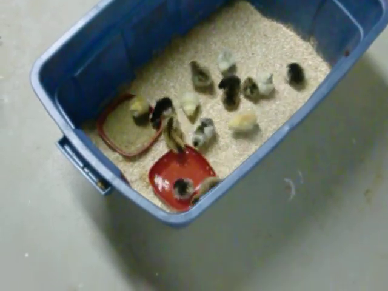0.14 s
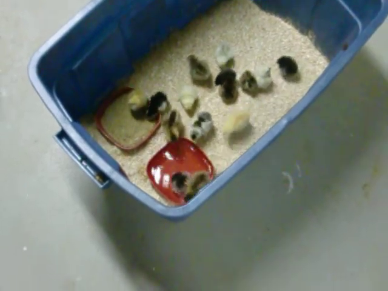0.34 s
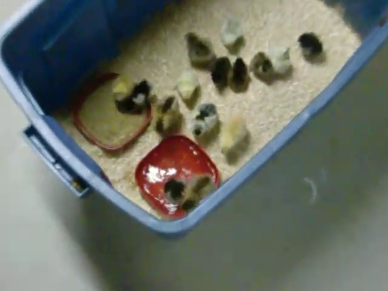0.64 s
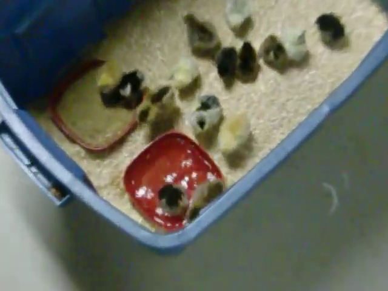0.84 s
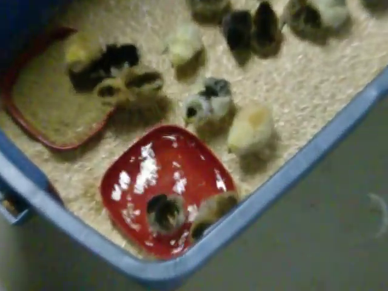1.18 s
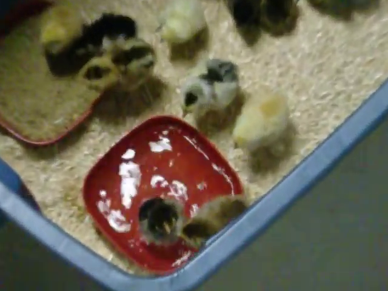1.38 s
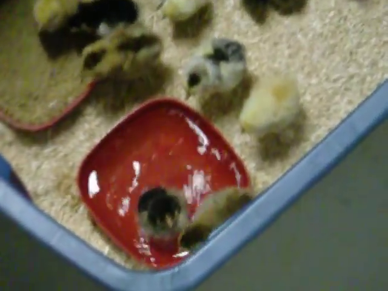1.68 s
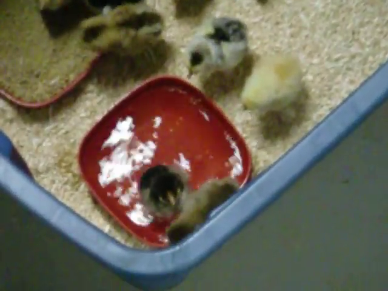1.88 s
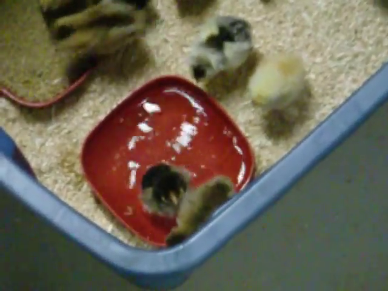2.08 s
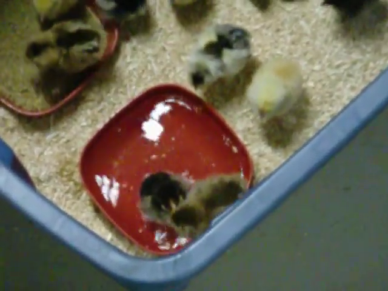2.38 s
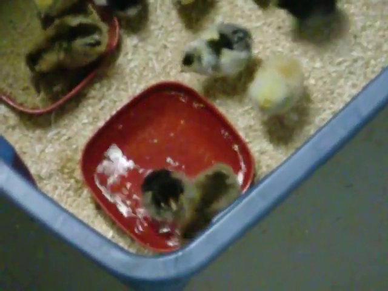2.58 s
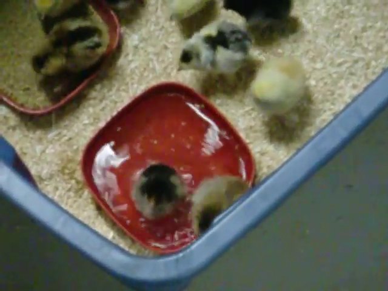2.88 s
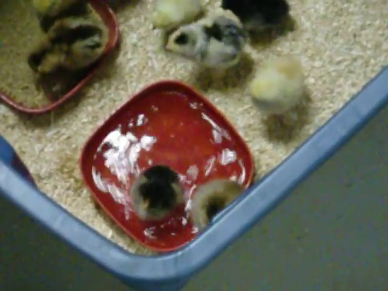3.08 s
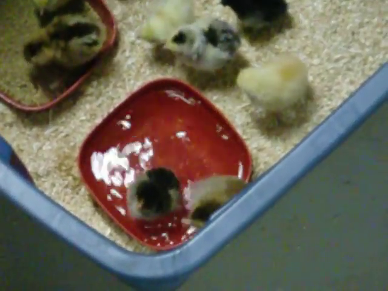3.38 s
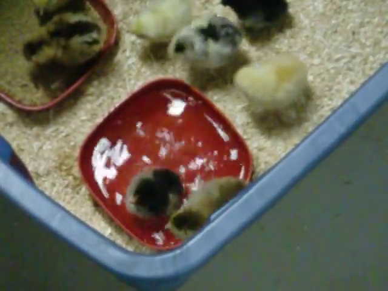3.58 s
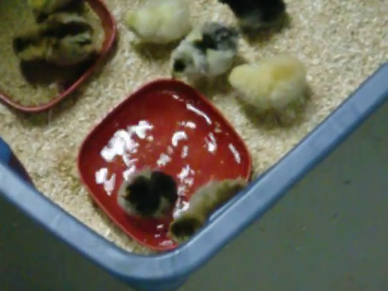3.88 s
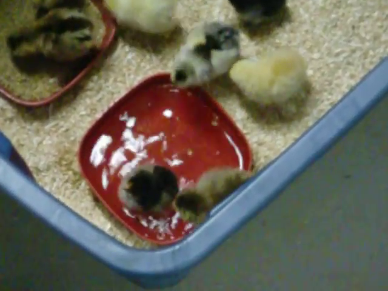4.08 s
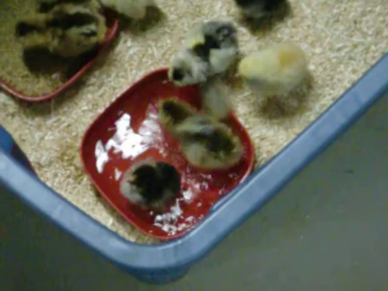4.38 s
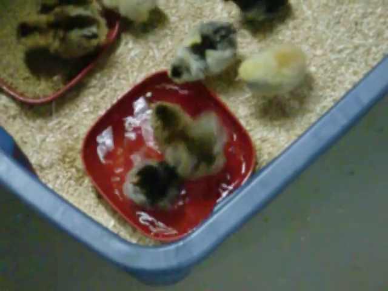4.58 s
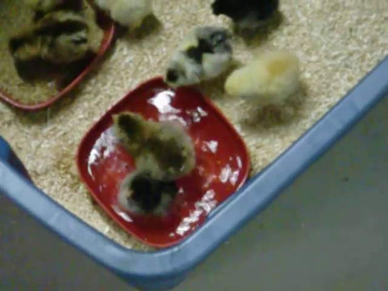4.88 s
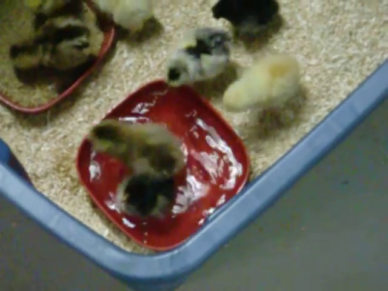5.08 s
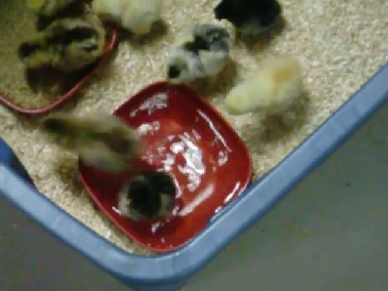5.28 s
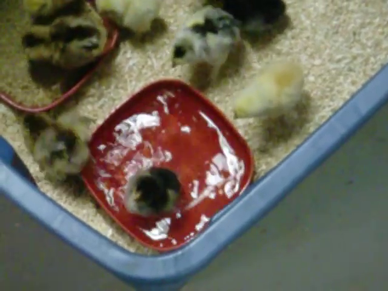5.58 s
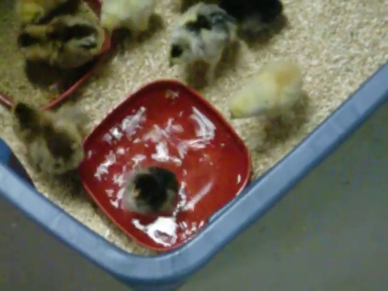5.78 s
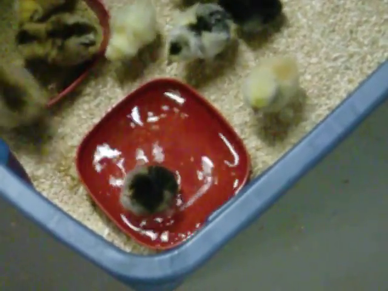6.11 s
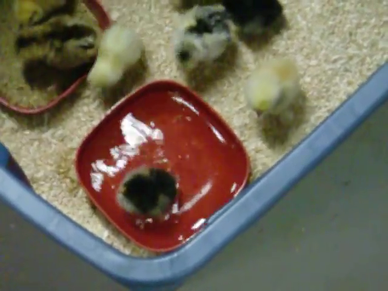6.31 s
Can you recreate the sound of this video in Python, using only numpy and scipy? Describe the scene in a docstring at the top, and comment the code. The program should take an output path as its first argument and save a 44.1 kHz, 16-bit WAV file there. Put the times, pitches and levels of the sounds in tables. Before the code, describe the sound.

Overlapping high, sliding chirps from a crowd of day-old chicks, close and lively, with faint ticks on plastic and bumps on a handheld microphone.

```python
"""Chicks in a plastic tub

Day-old chicks peep over one another in an open tub on the floor of a bare room: gliding whistles with overtones.
Feet and beaks tap a plastic dish (cracks and ringing modes) and rustle the shavings (grainy noise).
The recorder is hand-held: the hand rumbles, a finger knocks it twice hard and often softly.
Tub echoes and a room tail surround the sources; the converter adds a hiss that follows the sound."""
import sys
import numpy as np
from scipy import signal
from scipy.fft import rfft, irfft
from scipy.io import wavfile
from scipy.ndimage import uniform_filter1d

SR = 44100
rng = np.random.default_rng(int(sys.argv[2]) if len(sys.argv) > 2 else 0)


def wrap_up_sound(samples):
    """Save the sound to the file named by the first command line argument, as 16-bit audio."""
    columns = np.atleast_2d(samples).T
    # keep every value between -1 and 1, then stretch to whole-number steps
    tamed = np.clip(columns, -1, 1)
    steps = np.round(tamed * 32767).astype(np.int16)
    wavfile.write(sys.argv[1], SR, steps)


N = 284445   # samples

# Room tone at the microphone. Each row: frequency in Hz, relative density in dB per Hz.
AIR_SPECTRUM = [(60, -47), (100, -16), (200, -5), (320, 2.5), (460, -7), (1000, -8), (2100, -15),
                (4000, -8.5), (7700, -21), (15800, -29)]
# Feet in the shavings and the hand on the recorder. Each row: time in seconds, rustle in dB, rumble in dB.
STIR_LEVELS = [(0.0, -68, -53), (0.29, -68, -54), (0.43, -54, -50.5), (0.84, -49.5, -47.5),
               (0.97, -40, -49), (1.38, -48.5, -51), (1.44, -31, -49), (1.57, -40, -57), (1.67, -56, -54.5),
               (2.53, -53, -59), (2.8, -49, -57), (2.91, -72, -61), (3.4, -54, -59.5), (3.65, -46, -60.5),
               (4.4, -48, -60), (4.76, -64, -63), (4.97, -48, -62), (5.12, -66, -59.5), (6.45, -77, -62)]
# Colour of the shavings. Each row: frequency in Hz, relative density in dB per Hz.
RUSTLE_SPECTRUM = [(300, 4), (800, 1.5), (1500, 9), (2500, 11), (5000, 11), (12000, -4)]
# Finger knocks on the recorder, ahead of its bass cuts.
# Each row: time in seconds, peak in dB, direction as a sign, rise and fall time constants in seconds.
KNOCKS = [(0.237, 0.5, -1, 0.0011, 0.005), (2.0689, 1, 1, .0011, 0.0071), (2.372, -32, 1, 0.003, .003),
          (2.452, -33, 1, 0.0026, 0.0027), (3.496, -40, 1, 0.0016, 0.002), (3.699, -32, 1, 0.0017, 0.0016),
          (3.928, -27, 1, 0.0018, 0.0012), (4.203, -35, 1, 0.0045, 0.0046), (6.11, -33, 1, 0.0026, .003)]
# Bass cuts of the input. Each entry: corner in Hz, first the upper stage, then the lower one.
BASS_CUTS_HZ = [64, 9.3]
# Faint low blips. Each row: start in seconds, length in seconds, pitch in Hz, level in dB.
BLIPS = [(5.362, 0.042, 1600, -41), (5.367, 0.022, 998, -44), (5.407, 0.015, 974, -41.5),
         (5.411, 0.018, 1590, -54), (5.529, 0.029, 1596, -46.5), (2.784, 0.017, 1260, -38.5)]
# Taps on the dish. Each row: start in seconds, crack level in dB, crack pitch in Hz, ring against the crack in dB.
TAPS = [(0.235, -40, 2420, -24), (0.329, -33, 2280, -34), (0.428, -30.5, 1890, -42),
        (0.663, -34, 1890, -40), (1.513, -28, 1870, -35), (1.56, -26, 1900, -44), (1.578, -22, 2770, -44),
        (2.068, -26.5, 2060, -40), (2.723, -33, 1605, -15), (2.786, -35, 1330, -31),
        (3.777, -30.5, 1030, -21), (4.379, -23.5, 1360, -41), (4.9244, -20.5, 1890, -8.5),
        (5.341, -34, 1840, -33)]
# Ringing modes of the dish. Each row: frequency in Hz, relative level in dB, time to fall 60 dB in seconds.
DISH_MODES = [(491, -15, 0.3), (518, -8, 0.24), (561, -10, 0.15), (1230, -17, 0.09), (1580, -8, 0.055),
              (1870, -27, 0.06)]
# Peeps of the chicks. Some break in register within the row, through the early fall; others go on in a second row.
# Each row: start in seconds, rise, hold and fall in seconds, start, top, knee and end pitch in Hz,
# early fall from -1 to 1, start, top, knee and end level in dB,
# shift of the third and fourth partials in dB, shift of the second partial in dB.
PEEPS = [(0.0, 0.028, 0.038, 0.032, 5630, 5410, 5100, 3900, -0.12, -24, -26.5, -20, -30, -11, -1),
         (0.0, 0.022, 0.077, 0.054, 3770, 3925, 3600, 2600, -0.37, -27, -21.5, -23, -39, 7, 3.5),
         (0.0, 0.0012, 0.013, 0.028, 3510, 3480, 3380, 2690, -0.057, -26, -33, -28, -41, 0, 11.5),
         (0.228, 0.021, 0.005, 0.0065, 4360, 4710, 4530, 3970, -0.18, -39, -33, -31, -23.5, -3, -3),
         (0.263, 0.0012, 0.045, 0.027, 4170, 3990, 3870, 3120, -0.27, -26, -33.5, -34.5, -34, 5, 14),
         (0.298, 0.015, 0.082, 0.018, 4700, 5060, 5000, 5400, 0.49, -35, -42, -39, -35, -15, 3),
         (0.308, 0.072, 0.027, 0.043, 5640, 5930, 5100, 3380, 0.81, -45, -52, -23, -40, 4, 3),
         (0.438, 0.012, 0.04, 0.046, 4520, 4330, 3960, 2723, 0.41, -41, -51, -26, -38, 7.5, 4.5),
         (0.683, 0.018, 0.02, 0.089, 4760, 4720, 4600, 3005, 0.58, -51, -54, -31.5, -46.5, 2, 7),
         (0.75, 0.12, 0.014, 0.051, 4600, 5870, 5220, 3360, 0.8, -37, -38.5, -20.5, -37, 1, 2),
         (0.799, 0.027, 0.065, 0.063, 5770, 5920, 5570, 5380, -0.4, -51, -47, -30.5, -38, 0, -1),
         (0.818, 0.005, 0.041, 0.02, 3560, 3570, 3670, 3600, 0, -48, -40, -52, -48, -19, -6),
         (0.839, 0.02, 0.001, 0.002, 2300, 2900, 2830, 2800, 0.0, -46, -44, -54, -53, 12, 7),
         (0.856, 0.016, 0.00084, 0.002, 4290, 4680, 4680, 4680, 0, -50, -42, -46, -50, -15, -6),
         (0.931, 0.027, 0.032, 0.054, 4500, 4180, 3800, 2630, 0.35, -32, -36, -24, -43.5, 6, 5.5),
         (1.062, 0.041, 0.0069, 0.018, 5060, 5330, 5000, 4180, 0.0, -35, -23, -30, -27, 4, -3),
         (1.063, 0.047, 0.0009, 0.0017, 2740, 3590, 3600, 3600, 0.0, -39, -45, -47, -53, 6, -3),
         (1.099, 0.026, 0.084, 0.0041, 3710, 3890, 3680, 3800, 0.0, -34, -30, -27, -40, 11, -3),
         (1.129, 0.006, 0.013, 0.016, 3060, 3170, 2926, 2460, 0.0, -50, -52, -37, -38, 2, -2),
         (1.131, 0.018, 0.034, 0.027, 4180, 4017, 3940, 2860, 0.0, -20, -20.5, -27, -39, 6, 7),
         (1.189, 0.0061, 0.068, 0.047, 3750, 3803, 3520, 2640, -0.43, -29, -21.5, -23.5, -45, 5.5, -0.5),
         (1.367, 0.038, 0.0065, 0.042, 3880, 4900, 4700, 4390, 0.17, -39, -38, -37, -34, -2, 2),
         (1.407, 0.044, 0.018, 0.052, 5036, 4415, 4250, 3120, -0.039, -55, -37, -24.5, -35, 4, -4),
         (1.469, 0.062, 0.022, 0.02, 4290, 5240, 5180, 4400, -0.97, -34, -22.5, -18.5, -44, -15, -6),
         (1.47, 0.0063, 0.047, 0.01, 3550, 3450, 3280, 2880, 0.25, -47, -60, -31, -43, 6, 6),
         (1.508, 0.011, 0.073, 0.025, 5500, 5574, 5185, 4020, 0.45, -32, -31.5, -17, -39, -17, -14),
         (1.575, 0.0013, 0.0083, 0.039, 4210, 4530, 4030, 2830, -0.79, -31, -22, -15, -35, 1, -0.5),
         (1.671, 0.11, 0.075, 0.04, 3802, 3930, 3670, 2665, -0.3, -32.5, -20.5, -20, -38.5, 5.5, -0.5),
         (1.802, 0.012, 0.027, 0.047, 3680, 3660, 3400, 2880, -1.1, -29, -35, -38, -54, -4, -1),
         (1.812, 0.001, 0.014, 0.024, 3650, 3540, 3430, 2580, -0.25, -45, -45, -31, -49, 0, -1),
         (1.83, 0.037, 0.033, 0.009, 4510, 4910, 4530, 4530, 0.0, -46, -39, -39, -40, 6, 8),
         (1.888, 0.025, 0.024, 0.05, 4550, 4406, 4380, 2800, -0.14, -41, -27, -27, -41.5, 10, 3.5),
         (1.924, 0.061, 0.046, 0.023, 4840, 5450, 4960, 3830, 0.27, -30, -29, -23, -29, 3, 1.5),
         (2.025, 0.014, 0.012, 0.034, 4360, 4030, 3884, 3160, -0.2, -20.5, -22.5, -17.5, -54, 8.5, 6.5),
         (2.086, 0.02, 0.023, 0.024, 4590, 4670, 4600, 4450, 0.21, -49, -40, -31, -26, -15, -1),
         (2.096, 0.018, 0.04, 0.023, 3890, 3730, 3690, 2410, -0.49, -42, -33, -28, -37.5, 8, 5.5),
         (2.104, 0.001, 0.023, 0.025, 5840, 5950, 5800, 5250, 0.0, -41, -43, -45, -51, 0, 0),
         (2.147, 0.034, 0.095, 0.034, 4250, 5560, 5160, 3160, -0.25, -43, -33, -16, -34, 0, 0),
         (2.165, 0.13, 0.072, 0.05, 3737, 4020, 3685, 2675, -0.55, -28, -19, -20, -39.5, 6.5, 2.5),
         (2.237, 0.024, 0.01, 0.022, 5900, 5960, 5940, 5770, 0.0, -58, -51, -46, -52, 0, 0),
         (2.327, 0.001, 0.002, 0.018, 4940, 5000, 4860, 4490, -0.26, -13, -25, -32, -33, 6, 4),
         (2.337, 0.035, 0.019, 0.076, 4490, 4540, 4430, 3156, 0.17, -44, -36, -22.5, -44, 0, 0),
         (2.358, 0.014, 0.043, 0.053, 4140, 4185, 4070, 2840, 0.295, -22, -24, -32, -47, 22.5, 14),
         (2.402, 0.011, 0.065, 0.041, 5030, 4960, 4270, 3170, 0.22, -38, -43, -28, -46, -4, -9),
         (2.426, 0.045, 0.044, 0.02, 5000, 5450, 5000, 4380, -0.071, -31, -31, -27.5, -41, -13, 0),
         (2.515, 0.00076, 0.02, 0.015, 3710, 3740, 3160, 2560, -0.63, -46, -49, -35, -50, 20, -8),
         (2.524, 0.00096, 0.018, 0.049, 4360, 4260, 4150, 2970, -0.47, -27, -33, -16, -46, 8, 6.5),
         (2.574, 0.022, 0.11, 0.048, 4250, 5466, 5120, 3040, -0.64, -26, -25.5, -15, -38, 7, 1.5),
         (2.635, 0.039, 0.042, 0.066, 3800, 4265, 4137, 2490, -0.12, -40, -18, -20, -46, 15.5, 10.5),
         (2.735, 0.057, 0.13, 0.049, 3633, 3963, 3674, 2620, -0.33, -28, -24, -19, -40.5, 4, -1.5),
         (2.775, 0.00088, 0.031, 0.058, 4640, 4680, 4450, 3885, -0.15, -28, -30, -24, -26, -4, 1.5),
         (2.842, 0.0013, 0.015, 0.012, 3900, 3860, 3360, 2540, 0.24, -31, -28, -25, -37.5, 8, -2),
         (2.971, 0.032, 0.12, 0.037, 4240, 5450, 5120, 2325, -0.22, -30, -25.5, -14.5, -36, 3, 0.5),
         (3.009, 0.014, 0.015, 0.047, 4040, 4530, 4296, 3700, 0.2, -37, -24, -21.5, -18.5, 6, 5),
         (3.1, 0.0012, 0.012, 0.025, 3630, 3650, 3800, 3445, 0.44, -15, -23, -26.5, -25.5, -3, 11.5),
         (3.167, 0.011, 0.019, 0.039, 3580, 3720, 3500, 2350, 0.33, -28, -31, -24, -36, -2, -7),
         (3.226, 0.016, 0.025, 0.054, 4410, 4640, 4330, 2865, 0.3, -32, -31.5, -25, -38.5, 1, 4),
         (3.339, 0.035, 0.021, 0.01, 5050, 5500, 5170, 4150, 0.071, -32, -28, -28, -19, 1, -6),
         (3.359, 0.0092, 0.002, 0.007, 3930, 4450, 4350, 3760, 0.21, -26, -19, -25, -32, -20, -16),
         (3.382, 0.038, 0.054, 0.022, 3800, 3808, 3580, 2420, -0.21, -30, -32, -22.5, -46, 10, 12),
         (3.4, 0.045, 0.11, 0.038, 4930, 5620, 5086, 3550, 0.21, -25, -28.5, -16, -33, -14, -3.5),
         (3.401, 0.022, 0.024, 0.024, 4230, 4123, 3905, 3565, -0.15, -20, -17.5, -18.5, -36, 11, 10),
         (3.535, 0.0015, 0.035, 0.03, 3810, 3740, 3640, 2310, 0.79, -35, -29, -24.5, -37, -15, -12),
         (3.611, 0.026, 0.028, 0.023, 4750, 4860, 4470, 3700, -0.2, -31, -25.5, -24, -39, 4, -10),
         (3.704, 0.011, 0.0027, 0.0087, 4300, 4564, 4590, 3970, 0.0, -21, -21, -25, -25.5, 2, 8),
         (3.722, 0.015, 0.03, 0.033, 3950, 3960, 3810, 3000, 0.0, -26, -30, -26, -37, 15, 8),
         (3.756, 0.038, 0.04, 0.027, 5070, 5440, 5020, 4320, 0.58, -26, -24.5, -25, -32, 8, -8),
         (3.78, 0.0015, 0.032, 0.029, 3844, 3960, 3704, 2510, -0.52, -21, -21.5, -21, -47, 5, 10),
         (3.787, 0.013, 0.001, 0.0017, 4640, 4780, 4780, 4740, 0.0, -32, -30, -30, -33, -15, -6),
         (3.816, 0.045, 0.074, 0.06, 5580, 5620, 5270, 2880, 0.29, -26, -14.5, -14, -43, -3, -4.5),
         (3.85, 0.021, 0.028, 0.014, 4320, 4050, 3730, 2550, -0.09, -18.5, -19, -20.5, -22, 6, 3),
         (4.009, 0.044, 0.002, 0.009, 4610, 5060, 5100, 3500, 0.5, -23, -18, -19, -42, -15, -4),
         (4.059, 0.015, 0.029, 0.03, 7400, 7150, 6630, 5530, -0.041, -30, -28, -22.5, -44, 0, 0),
         (4.061, 0.013, 0.024, 0.032, 3680, 3510, 3430, 2780, -0.33, -21, -24.5, -22, -41, 2, 0),
         (4.08, 0.001, 0.002, 0.0069, 4930, 5030, 4970, 4800, -0.023, -32, -28, -35, -41, -15, -6),
         (4.096, 0.031, 0.043, 0.023, 4820, 4720, 4240, 3350, -0.021, -38, -36, -28, -46, -15, -6),
         (4.187, 0.052, 0.11, 0.041, 4830, 5513, 5237, 2380, 0.01, -31, -19.5, -18.5, -44, -2, -8),
         (4.187, 0.001, 0.05, 0.017, 4520, 4600, 4480, 4300, 0.083, -41, -36, -33.5, -22, 4, 13),
         (4.24, 0.012, 0.018, 0.056, 5400, 5100, 4620, 3010, 0.56, -25, -41, -23, -35, -4, 1),
         (4.307, 0.056, 0.052, 0.016, 3730, 3983, 3760, 3810, 0.0, -37, -21.5, -17, -40, 3, -1),
         (4.376, 0.022, 0.024, 0.021, 4370, 4000, 3707, 2800, -0.67, -16, -27.5, -23, -50, -2, 8.5),
         (4.414, 0.0018, 0.053, 0.041, 3720, 3840, 3550, 2670, -0.81, -41, -38, -25, -37, 7, 6.5),
         (4.622, 0.022, 0.037, 0.042, 4050, 4130, 3750, 2370, -0.29, -47, -29.5, -24, -39, -41, -18),
         (4.642, 0.029, 0.028, 0.01, 4110, 4820, 4550, 4470, -0.34, -49, -44, -36, -34, -11, -5),
         (4.687, 0.056, 0.11, 0.042, 5350, 5570, 5070, 2930, 0.4, -27, -16.5, -19, -45, -3, -4.5),
         (4.743, 0.021, 0.029, 0.034, 4560, 4450, 4070, 3210, 0.081, -35, -34, -27, -38, -5, -5),
         (4.796, 0.011, 0.01, 0.027, 4810, 5100, 5060, 4680, -0.16, -31, -25, -25, -31, -15, -4),
         (4.849, 0.026, 0.028, 0.02, 4220, 4040, 3920, 2220, -0.92, -15, -20.5, -21, -41, 7, 6),
         (4.938, 0.058, 0.12, 0.045, 3800, 3947, 3594, 2715, -0.43, -30, -20, -22, -35.5, 5, 4),
         (5, 0.0012, 0.003, 0.041, 3690, 3900, 3700, 2380, 0.32, -37, -33, -21.5, -43, -27, -19),
         (5.292, 0.081, 0.00063, 0.002, 2520, 4940, 4830, 4970, 0.12, -41, -42, -64, -54, -17.5, -17),
         (5.297, 0.037, 0.13, 0.026, 5110, 5560, 5100, 3320, 0.78, -55, -27.5, -17.5, -32, -11, -5.5),
         (5.305, 0.049, 0.028, 0.027, 3920, 4090, 3880, 2470, 0.99, -45, -23, -28.5, -30.5, -15, -10),
         (5.371, 0.0009, 0.029, 0.053, 4650, 4640, 4530, 4170, 0.34, -46, -42, -43, -26, -15, -1),
         (5.5, 0.0018, 0.011, 0.028, 4700, 4720, 4500, 3310, -0.044, -27, -28, -23.5, -38, -19, -14),
         (5.644, 0.027, 0.0046, 0.016, 3910, 4224, 4024, 2770, 0.0, -48, -28, -31, -26.5, -21, -13),
         (5.695, 0.001, 0.019, 0.016, 2687, 2806, 2713, 2280, 0.0, -19, -18, -26.5, -40, -24, -12),
         (5.84, 0.07, 0.013, 0.011, 3600, 4760, 4530, 4490, -0.24, -60, -43.5, -38, -35, 1, 12),
         (5.918, 0.017, 0.031, 0.057, 4500, 4390, 4490, 3010, 0.42, -41, -50, -32.5, -39, 2, 0.5),
         (5.92, 0.02, 0.0046, 0.013, 6500, 6690, 6530, 6550, 0.0, -59, -49, -50, -59, -5, 8),
         (5.992, 0.045, 0.02, 0.039, 3810, 3870, 3610, 2490, 0.88, -36, -30.5, -28.5, -31.5, -16, -16.5),
         (6.18, 0.015, 0.0011, 0.002, 4480, 4840, 5070, 5070, 0.0, -43, -45, -54, -58, -21, -8),
         (6.183, 0.001, 0.015, 0.014, 2520, 2590, 2290, 2340, 0.0, -52, -48, -42, -53, -18, -19),
         (6.201, 0.014, 0.004, 0.015, 3740, 4210, 4240, 4080, 0.0, -44, -49, -40, -61, -18, -9),
         (6.282, 0.015, 0.046, 0.032, 4060, 4092, 3900, 2340, 1, -36, -30.5, -21, -36, -30, -15.5)]
# Upper overtones: the microphone resonates near 11-12 kHz and lifts overtones there.
# Each row: pitch in Hz, third partial in dB, fourth partial in dB, both before the shift of the peep.
UPPER_PARTIALS = [(2600, -36, -35), (3200, -34, -41), (3440, -28.5, -44), (3835, -23, -44),
                  (4070, -30, -29), (4500, -47, -45), (5000, -42, -50)]
# Second partial against the first, strong on low notes. Each row: pitch in Hz, level in dB before the shift.
SECOND_PARTIAL = [(2400, 9.5), (2900, -3.5), (3400, -8.5), (3750, -14), (3900, -25), (4250, -22.5),
                  (4400, -28.5), (5600, -23), (7000, -10)]
# Gain of the throat on the whistle. Each row: pitch in Hz, gain in dB.
THROAT_GAIN = [(2300, 0.5), (2800, 1), (3300, 0), (3700, 1), (4200, 0.5), (4700, 2), (5200, 0), (5700, 1)]
# Echoes from the tub walls, close by. Each row: delay in seconds, level in dB against the direct sound.
TUB_ECHOES = [(.0011, -42.5), (.0023, -28), (.0037, -23.5), (.0058, -32), (.0091, -33.5)]
# Decay of the bare room. Each row: frequency in Hz, time of the first slope to fall 60 dB in seconds.
ROOM_T60 = [(300, 0.4), (2500, 0.25), (5000, 0.32), (8000, 0.27), (15000, 0.14)]
# Colour of the room tail. Each row: frequency in Hz, relative level in dB.
ROOM_COLOUR = [(300, 10.5), (2500, 1.5), (5000, 3.5), (8000, 4.5), (15000, 4)]
# Converter hiss. Each row: frequency in Hz, relative density in dB per Hz.
HISS_SPECTRUM = [(100, 3.5), (1000, 7), (3000, 7), (8000, 8), (15000, 7.5)]

# Pitch of a peep: shape of the glide to the top and of the sag, unsteadiness as a share.
RISE_POWER, SAG_POWER, PITCH_WOBBLE = 1.8, 2.7, 0.0044
# An early fall breaks at this share of its time, ahead by this share of the drop, with a swell in dB.
BREAK_SHARE, BREAK_DROP, BREAK_SWELL_DB = 0.252, 0.4, 3.5
# Level of a peep: it gives way late in the fall, and drops with the glide in dB per kHz/s.
FADE_POWER, GLIDE_LOSS_DB = 1.58, 0.0279
# Unsteady syrinx: level waver, noise skirt around the whistle, flicker of the overtones.
WAVER_DB, BREATHY_DB, FLICKER_DB = 1, -27, 2.5
# Room tail against the direct sound, and a weaker, slower second slope from the far walls.
ROOM_DB, LATE_DB, LATE_STRETCH = -6, -11, 2.7
# Dip in the microphone housing; depth is the share removed.
NOTCH_HZ, NOTCH_WIDTH_HZ, NOTCH_DEPTH = 7680, 330, 0.69
# Gain control: threshold, dB of cut per dB over it, release, attack.
LIMIT_DB, SQUEEZE, RELEASE_DB_S, ATTACK_S = -6.5, 2.13, 49, 0.014


def amp(db):
    """Turn dB into gain."""
    return 10 ** (np.asarray(db) / 20)


def rms_one(x):
    """Scale to rms 1."""
    return x / np.sqrt(np.mean(x ** 2) + 1e-20)


def at_hz(points, hz):
    """Read the first two columns of a spectrum on a log-frequency axis."""
    points = np.array(points)
    return np.interp(np.log(hz + 1), np.log(points[:, 0]), points[:, 1])


def coloured(x, spectrum):
    """Shape x by a spectrum in dB and scale to rms 1."""
    hz = np.fft.rfftfreq(len(x), 1 / SR)
    return rms_one(irfft(rfft(x) * amp(at_hz(spectrum, hz)), len(x)))


def lagged(x, seconds):
    """Smooth x with one pole."""
    r = np.exp(-1 / (max(seconds, 1e-5) * SR))
    return signal.lfilter([1 - r], [1, -r], x)


def wander(seconds):
    """Smooth random motion of rms 1: noise through two poles."""
    return rms_one(lagged(lagged(rng.standard_normal(N), seconds), seconds))


def room_air():
    """Steady room tone: coloured noise."""
    return amp(-52) * coloured(rng.standard_normal(N), AIR_SPECTRUM)


def handling_rumble():
    """Lumpy rumble of a hand on the recorder: low noise whose strength wanders."""
    s, _, rumble_db = np.transpose(STIR_LEVELS)
    lumps = rng.standard_normal(N) * amp(2.5 * wander(0.015))
    rumble = coloured(lumps, [(12, -2.0), (35, 1.5), (90, -7), (200, -10), (600, -55)])   # (Hz, dB per Hz)
    return rumble * amp(np.interp(np.arange(N) / SR, s, rumble_db))


def knocks():
    """A push on the diaphragm builds up and lets go; the input's bass cut makes it swing back."""
    t, push = np.arange(N) / SR, np.zeros(N)
    for s, peak_db, direction, rise, fall in KNOCKS:
        time_constant = np.where(t < s, rise, fall)
        push += np.sign(direction) * amp(peak_db) * np.exp(-np.abs(t - s) / time_constant)
    upper_hz, lower_hz = BASS_CUTS_HZ
    for hz in (upper_hz, lower_hz, lower_hz):
        push = push - lagged(push, 1 / (2 * np.pi * hz))
    return push


def shavings():
    """Feet stir the shavings: coloured noise with fast grains and slower surges."""
    s, rustle_db, _ = np.transpose(STIR_LEVELS)
    grains = rng.standard_normal(N) * amp(1.0 * wander(0.0016) + 3.0 * wander(0.042))
    return coloured(grains, RUSTLE_SPECTRUM) * amp(np.interp(np.arange(N) / SR, s, rustle_db))


def low_blips():
    """Faint low sines that swell and fade without a crack."""
    out = np.zeros(N)
    for s, length, hz, level_db in BLIPS:
        at, count = round(s * SR), round(length * SR)
        tone = np.sin(2 * np.pi * hz * np.arange(count) / SR)
        out[at:at + count] += amp(level_db) * np.hanning(count) ** 0.5 * tone
    return out


def dish_taps():
    """Each tap is a short crack, a fast-dying sine, that sets the modes of the dish ringing."""
    out, t = np.zeros(N), np.arange(SR // 2) / SR
    ring = sum(amp(mode_db - 60 * t / t60) * np.sin(2 * np.pi * hz * t) for hz, mode_db, t60 in DISH_MODES)
    crack_t60 = 0.011   # s
    for s, crack_db, crack_hz, ring_db in TAPS:
        crack = amp(-60 * t / crack_t60) * np.sin(2 * np.pi * crack_hz * t)
        tap = amp(crack_db) * (crack + amp(ring_db) * ring)
        at = round(s * SR)
        out[at:at + len(t)] += tap[:N - at]
    return out


def peep_pitch(up, held, down, early, start_hz, top_hz, knee_hz, end_hz):
    """The whistle slows into its top, sags ever faster while held, then falls away."""
    early = np.clip(early, -1, 1)
    if early > 0:
        lead = np.interp(down, [0, BREAK_SHARE, 1], [0, BREAK_DROP, 0])
    else:
        lead = down * (1 - down)
    pitch = top_hz + (start_hz - top_hz) * (1 - up) ** RISE_POWER
    pitch += (knee_hz - top_hz) * held ** SAG_POWER
    pitch += (end_hz - knee_hz) * (down + early * lead)
    return uniform_filter1d(pitch, size=380)   # corners of the glide are rounded


def peep_level(up, held, down, early, start_db, top_db, knee_db, end_db, pitch):
    """The level moves with the peep, swells at a break, follows the throat and drops in fast glides."""
    level_db = top_db + (start_db - top_db) * (1 - up) + (knee_db - top_db) * held
    level_db += (end_db - knee_db) * down ** FADE_POWER
    level_db += BREAK_SWELL_DB * max(early, 0) * np.interp(down, [0, BREAK_SHARE, 1], [0, 1, 0])
    khz_per_s = np.abs(np.gradient(pitch)) * SR / 1000
    return level_db + at_hz(THROAT_GAIN, pitch) - GLIDE_LOSS_DB * khz_per_s


def chicks():
    """Each peep is a near-sine whistle from the syrinx, its level shaped by the throat, with up to three overtones."""
    out, waver, skirt = np.zeros(N), wander(0.0047), wander(0.00057)
    table_hz, *upper_db = np.transpose(UPPER_PARTIALS)
    for row, (start_phase, shift) in zip(PEEPS, rng.random((len(PEEPS), 2))):
        s, rise, hold, fall = row[:4]
        early, (shrill_db, second_db) = row[8], row[13:]
        length = rise + hold + fall
        first = max(round((s - 0.004) * SR), 0)
        last = min(round((s + length + 0.0026) * SR), N)
        i = np.arange(first, last)
        t = i / SR - s
        # progress through each part, 0 to 1
        parts = ((0, rise), (rise, hold), (rise + hold, fall))
        up, held, down = (np.clip((t - at) / max(span, 1e-4), 0, 1) for at, span in parts)
        pitch = peep_pitch(up, held, down, early, *row[4:8])
        level_db = peep_level(up, held, down, early, *row[9:13], pitch)

        own = (i + int(shift * N)) % N   # every row wavers on its own
        pitch *= 1 + PITCH_WOBBLE * waver[own - N // 2]
        phase = 2 * np.pi * (np.cumsum(pitch) / SR + start_phase)
        flicker = amp(FLICKER_DB * waver[-own])   # overtones come and go more than the whistle
        second = amp(at_hz(SECOND_PARTIAL, pitch) + second_db)
        tone = np.sin(phase) + flicker * second * np.sin(2 * phase)
        for k, partial_db in zip((3, 4), upper_db):
            partial = amp(shrill_db + np.interp(pitch, table_hz, partial_db))
            below_nyquist = k * pitch < SR / 2
            tone += flicker * partial * np.sin(k * phase) * below_nyquist

        edge = np.minimum(t + 0.0016, length + 0.0044 - t) / 0.0037   # 3.7 ms fades
        unsteady = amp(WAVER_DB * waver[own]) + amp(BREATHY_DB) * skirt[own]
        out[i] += np.sqrt(2) * amp(level_db) * np.clip(edge, 0, 1) * unsteady * tone
    return out


def space(x):
    """Early echoes from the tub walls, and a noise tail of the room that dies band by band."""
    t = np.arange(SR) / SR
    tail, edges = np.zeros(len(t)), np.geomspace(200, 18000, num=9)
    for low, high in zip(edges, edges[1:]):
        band_filter = signal.butter(2, [low, high], "band", fs=SR, output="sos")
        band = signal.sosfilt(band_filter, rng.standard_normal(len(t)))
        hz = np.sqrt(low * high)
        fall_db = -60 * t / at_hz(ROOM_T60, hz)
        slopes = amp(fall_db) + amp(LATE_DB + fall_db / LATE_STRETCH)
        tail += band * amp(at_hz(ROOM_COLOUR, hz)) * slopes
    tail *= 1 - np.exp(-t / 0.0019)   # the tail builds up
    response = amp(ROOM_DB) * tail / np.sqrt(np.sum(tail ** 2))
    response[0] += 1   # direct sound
    for delay, echo_db in TUB_ECHOES:
        response[round(delay * SR)] += amp(echo_db)
    response /= np.sqrt(np.sum(response ** 2))
    return signal.fftconvolve(x, response)[:N]


def scene():
    """Chicks, dish, blips and shavings in the room; room tone, rumble and knocks reach the microphone directly."""
    in_room = space(chicks() + dish_taps() + low_blips() + shavings())
    return (in_room + room_air() + handling_rumble() + knocks())[None]


def housing_dip(x):
    """The microphone housing takes out part of a narrow band."""
    b, a = signal.iirpeak(NOTCH_HZ, NOTCH_HZ / NOTCH_WIDTH_HZ, fs=SR)
    return x - NOTCH_DEPTH * signal.lfilter(b, a, x)


def gain_control(x):
    """Peaks over the threshold duck the level, which then recovers at a steady rate in dB."""
    release_db = RELEASE_DB_S * np.arange(N) / SR
    over_db = 20 * np.log10(np.abs(x) + 1e-9) - LIMIT_DB
    held_db = np.maximum.accumulate(SQUEEZE * over_db + release_db) - release_db
    return x * amp(-lagged(np.maximum(held_db, 0), ATTACK_S))


def converter_hiss(x):
    """Coloured noise that follows the running slope of the sound, as the converter's step size does."""
    slope = np.sqrt(lagged(np.diff(x, prepend=0) ** 2, 0.00089))   # lag in s
    return amp(-19) * slope * coloured(rng.standard_normal(N), HISS_SPECTRUM)


def record(dry):
    """The hand-held recorder: housing dip, gain control, converter hiss, then a steep cut of the top."""
    x = gain_control(housing_dip(dry[0]))
    x = x + converter_hiss(x)
    top_cut = signal.ellip(14, 0.2, 75, 15800, fs=SR, output="sos")   # cutoff in Hz
    return signal.sosfilt(top_cut, x)[None]


dry = scene()
out = record(dry)
wrap_up_sound(out)
```